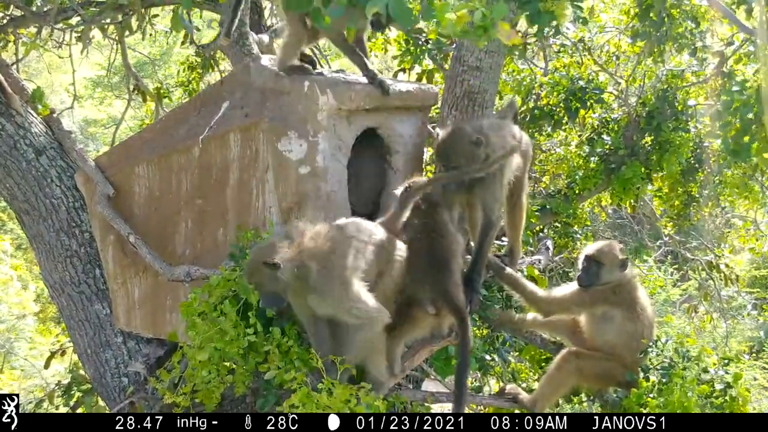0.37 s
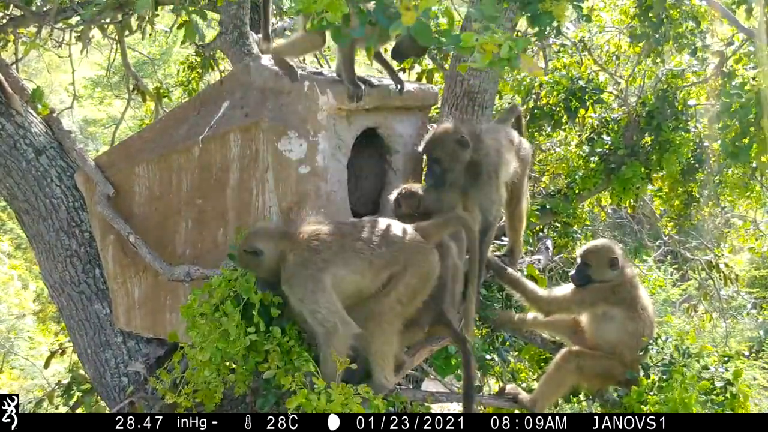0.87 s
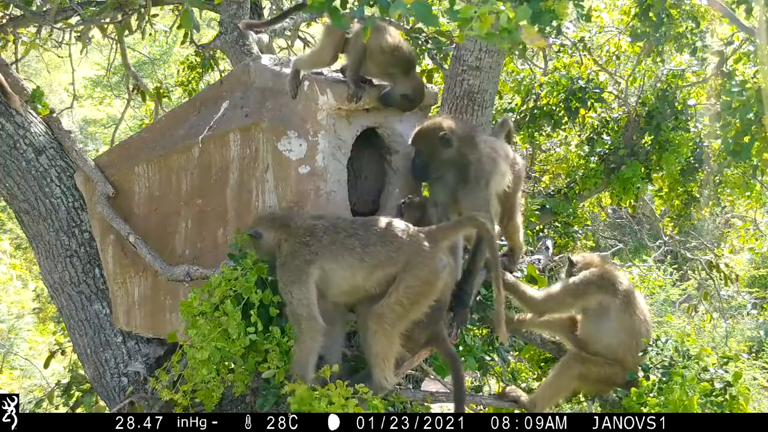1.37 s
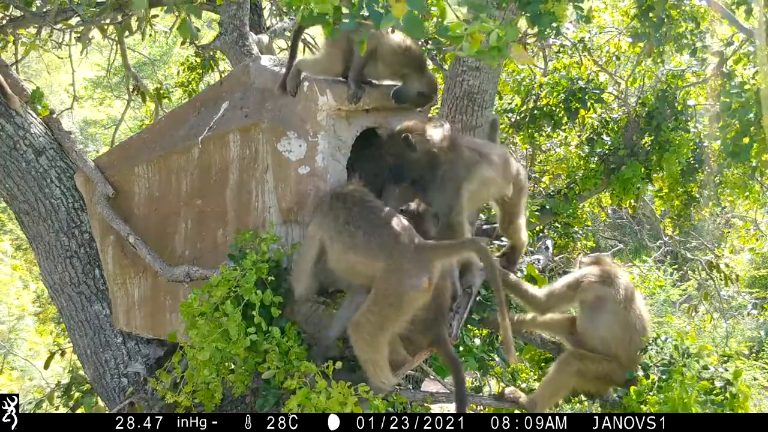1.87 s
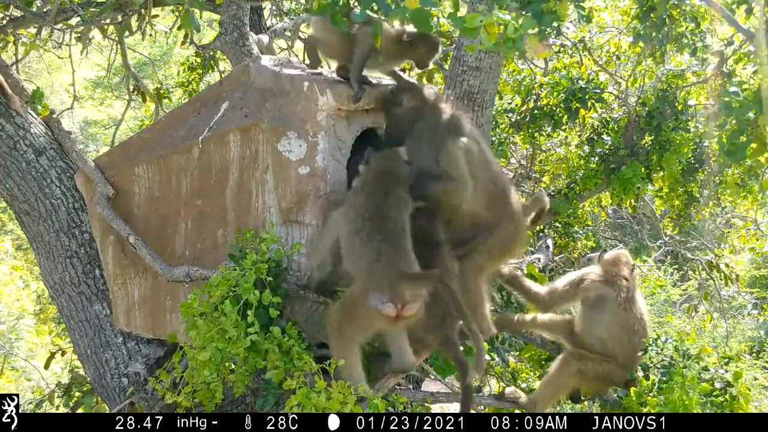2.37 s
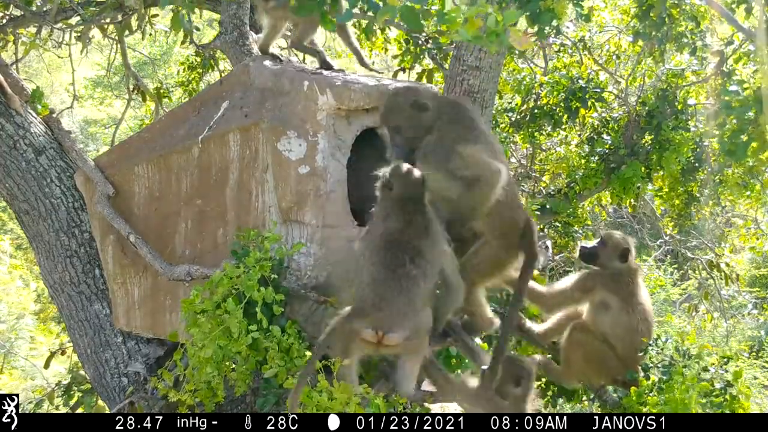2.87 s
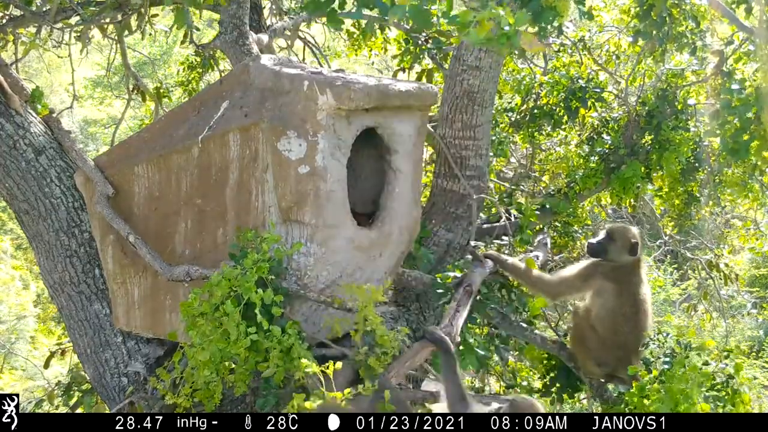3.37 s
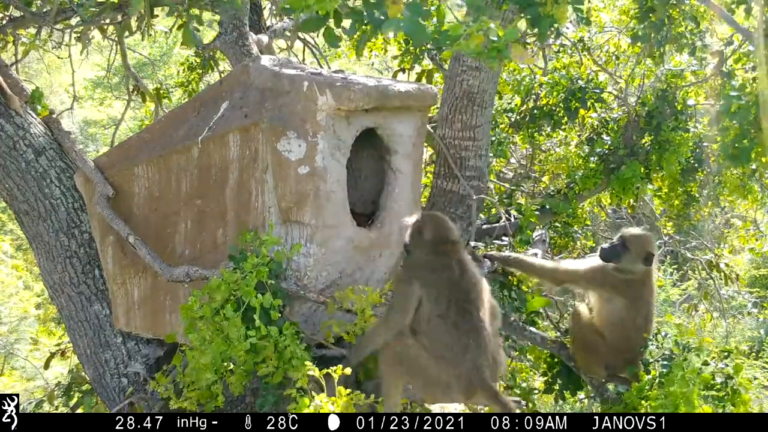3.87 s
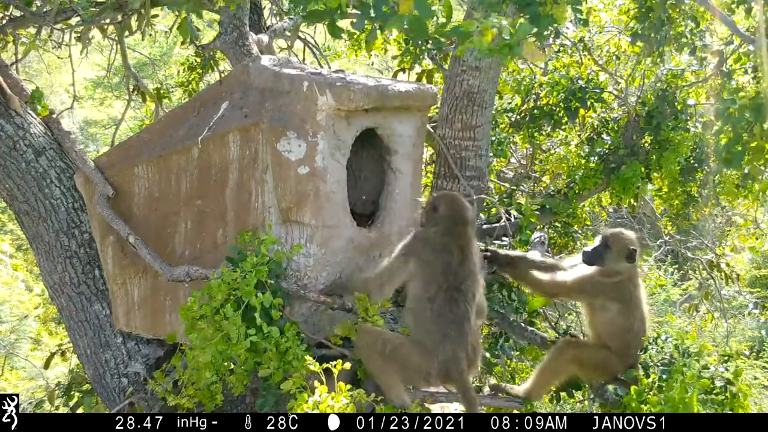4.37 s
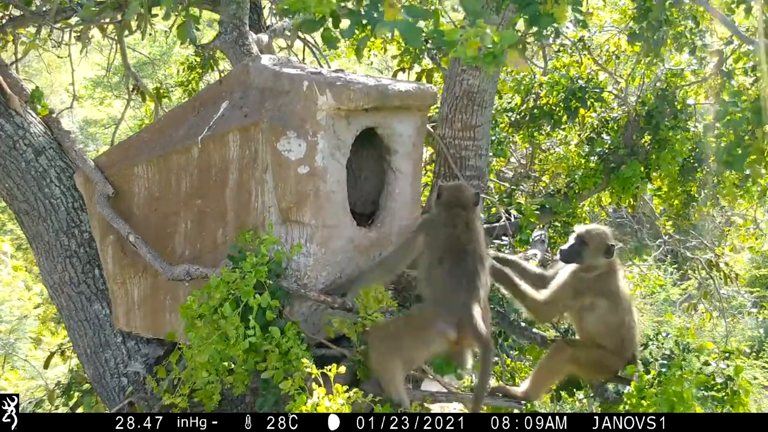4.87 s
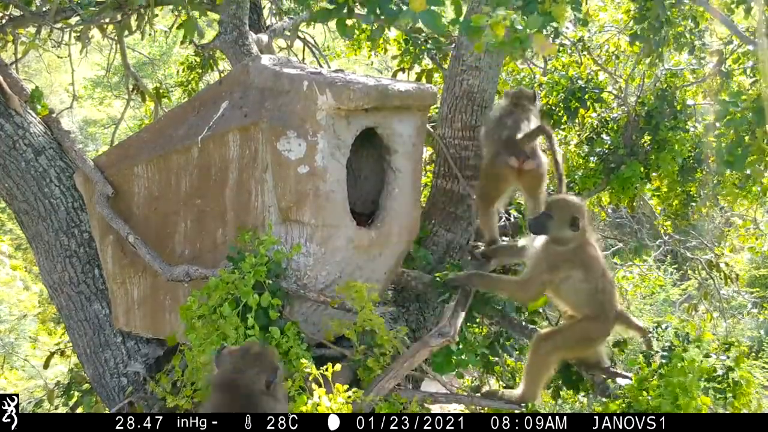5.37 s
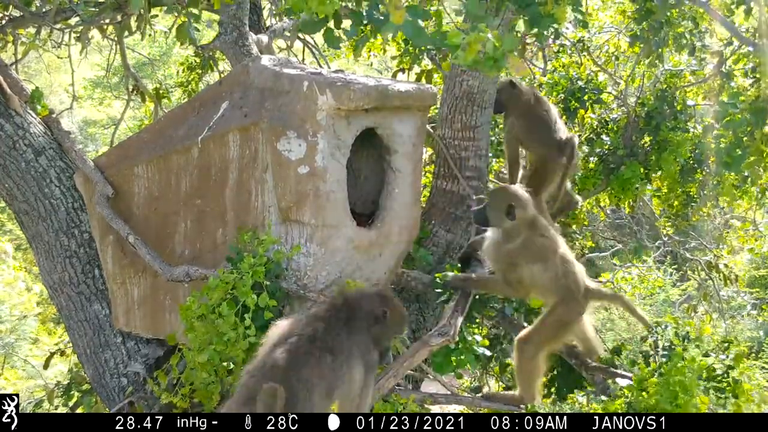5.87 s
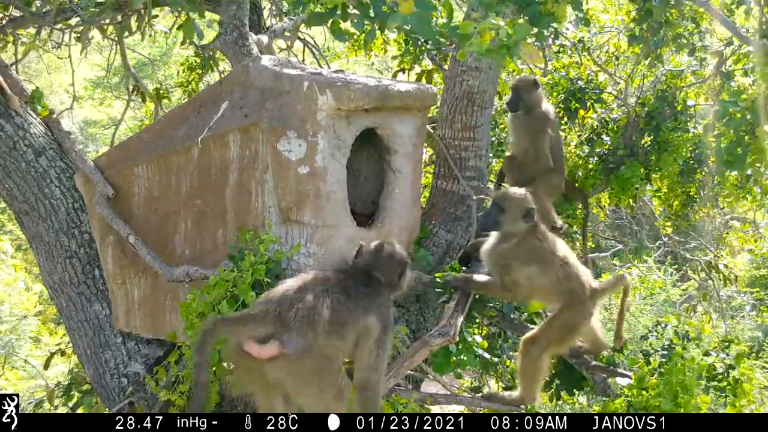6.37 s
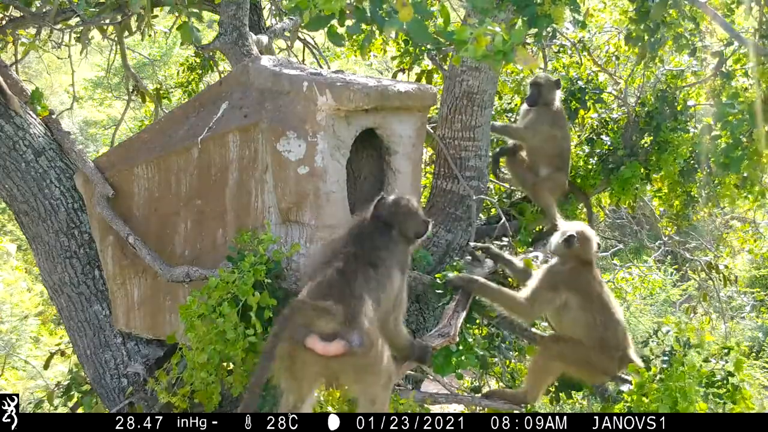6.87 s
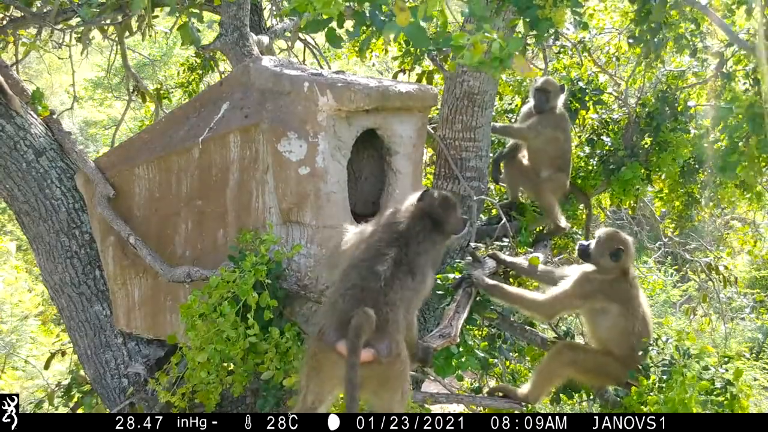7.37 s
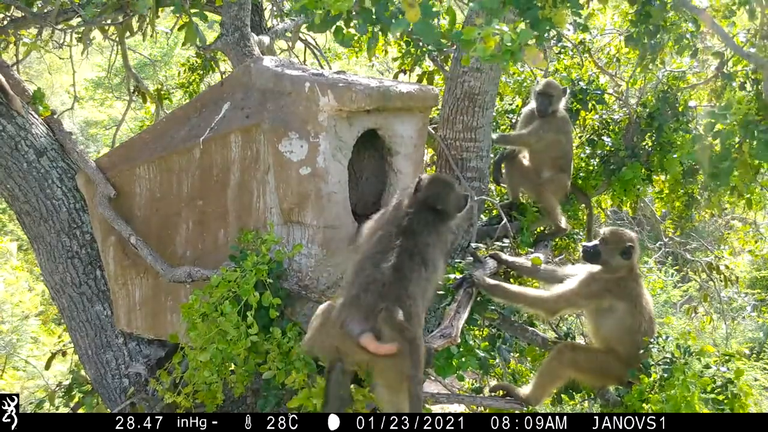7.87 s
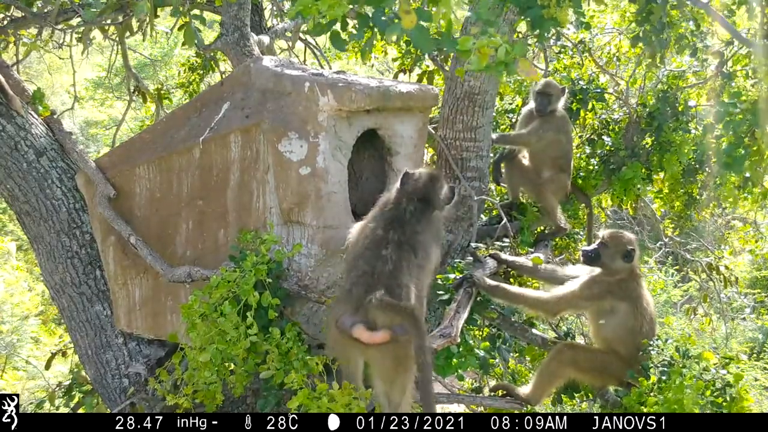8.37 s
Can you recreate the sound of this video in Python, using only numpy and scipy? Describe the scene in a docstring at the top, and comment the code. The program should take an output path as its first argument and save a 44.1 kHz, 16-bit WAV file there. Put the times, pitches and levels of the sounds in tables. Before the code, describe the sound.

Close to a small, treble-dulled outdoor microphone, baboons clamber around a tree-mounted box. At first only light rustle and distant bird whistles are heard over a soft steady hush. Woody bumps and twig ticks gather, swelling into a loud leafy crash with hard snaps midway. Smaller crackles and rustles follow, then sparse chirps, and finally fluttering low wind bursts.

```python
"""A bird trills and a twig snaps over the hush of the bush (soft patchy noise); chirps and squeaks follow
(gliding whistles). Baboons then thump a wooden nest box (noisy blows ringing its planks) and drop through
leafy branches: leaves swell (showers of noise grains) and twigs crack (a click and splinters through a ring).
The rustle thins out, birds call on, and near the end wind pops on the microphone (one-cycle bursts on a rumble).
A small trail camera hears it close up, dull in the treble, its circuits whining faintly (a cluster of sines)."""
import sys
import numpy as np
from scipy import signal
from scipy.io import wavfile
from scipy.ndimage import uniform_filter1d

SR = 44100
rng = np.random.default_rng(int(sys.argv[2]) if len(sys.argv) > 2 else 0)


def pcm_store(signal):
    """Save signal as 16-bit PCM."""
    levels = np.round(np.clip(np.atleast_2d(signal), -1, 1) * 32767)
    wavfile.write(sys.argv[1], SR, levels.astype(np.int16).T)


def boost_factor(decibels):
    """Convert a level in decibels to a linear amplitude factor."""
    exponent = np.asarray(decibels, float) / 20
    return 10 ** exponent


N = 373968  # length in samples

# tone of the hush: [f/Hz, level/dB]
HUSH_TONE = [(60, -39.5), (120, -7), (300, -1.5), (620, 2), (1400, 0.5), (2600, -5), (4000, -11),
             (8000, -20.5), (16000, -9.5)]
HUSH_DB = -55  # rms

# wind rumble over the microphone port: [t/s, level/dB]
WIND_LEVEL = [(0, -68), (.6, -65), (.85, -75), (2, -72.5), (2.9, -74), (3.4, -67), (4, -71.5), (6, -79),
              (7.4, -72.5), (7.9, -64.5), (8.48, -55.5)]
# tone of that rumble: [f/Hz, level/dB]
RUMBLE_TONE = [(8, -6.5), (25, -5), (70, -3), (150, -10.5), (400, -15.0), (1500, -72.5)]
# the strongest eddies bursting on the port: [centre t/s, level/dB, f/Hz]
POPS = [(7.58, -45, 100), (7.926, -44, 106), (7.961, -44, 105), (8.04, -36.5, 205), (8.055, -40, 130),
        (8.11, -32.5, 138), (8.18, -41, 137), (8.212, -41, 127), (8.311, -35, 218), (8.328, -40, 256),
        (8.352, -40, 161), (8.375, -36, 170), (8.391, -38.5, 193)]
# span of the random lesser eddies: [from t/s, to t/s, middle level/dB, lowest f/Hz, highest f/Hz]
GUST = (8.0, 8.46, -48.5, 110, 227)

# a small bird's calls of three chirps: [middle chirp t/s, level/dB of the last two, level/dB of the first]
BIRD_CALLS = [(1.065, -55, -60), (1.737, -54, -58), (5.31, -58, -70), (6.055, -54, -65),
              (6.867, -52.5, -70), (7.614, -56, -59), (8.333, -55.5, -61)]
# the chirps within a call: [t/s from the middle chirp, f/Hz]
CALL_PATTERN = [(-.054, 3000), (0, 3080), (.055, 3080)]
CHIRP_GLIDE_HZ, CHIRP_S = -430, .036
# other whistles and squeaks: [centre t/s, level/dB, centre f/Hz, glide f/Hz, length t/s]
WHISTLES = [(0.848, -56, 1920, -200, 0.063), (1.221, -58, 3225, 300, 0.03),
            (1.275, -61.5, 3470, 150, 0.065), (1.338, -56, 3190, -430, 0.038),
            (1.66, -56, 2270, -300, 0.034), (2.697, -50.5, 2750, 600, 0.082),
            (5.495, -52.5, 2760, -200, 0.06), (5.545, -52, 3230, -300, .025),
            (6.925, -53.5, 2005, -100, 0.052), (8.426, -56, 1646, -500, 0.042), (8.43, -56, 5950, 450, .06)]
# phrases of a trilling bird, levels 6 dB under the nominal sine peak:
# [start t/s, length t/s, first level/dB, last level/dB, first f/Hz, last f/Hz]
TRILLS = [(0, .1, -61, -67, 1500, 1520), (.525, .65, -60, -62.5, 1316, 1550),
          (2.103, .21, -65, -58, 1350, 1400), (7.03, 0.153, -58, -64, 1403, 1300),
          (7.65, .34, -62, -64, 1485, 1395)]
TRILL_PER_S = 41  # notes a second on average
# scratchy squeaks: [from t/s, to t/s, level/dB, lowest f/Hz, highest f/Hz]
CHATTER = (1.65, 1.85, -57, 1750, 2550)

# hands and feet on box and boughs: [fullest force t/s, peak level/dB, strongest f/Hz, contact t/s]
THUMPS = [(2.411, -43, 394, 0.0017), (2.45, -30, 550, 0.0028), (2.531, -44, 298, 0.0029),
          (2.865, -32, 630, 0.012), (2.93, -46, 338, 0.0072), (3.004, -39, 380, 0.0019),
          (3.105, -44, 345, 0.01), (3.183, -34.5, 500, 0.011), (3.265, -46.5, 240, 0.0056),
          (3.447, -44, 750, 0.006), (4.244, -39.5, 480, 0.005)]
# ringing planks of the box: [f/Hz, level/dB, 60 dB decay t/s]
PLANKS = [(255, -6.5, 0.06), (389, 3, 0.024), (500, 2.5, 0.059), (619, 12.5, 0.02), (772, 1.5, 0.064),
          (890, 12.5, 0.023)]

# clearest cracks of twigs and claws: [t/s, peak level/dB, ring f/Hz, time for the splinters to halve t/ms]
SNAPS = [(0.0842, -38.5, 3020, 3.3), (1.1142, -40.5, 3300, 2.7), (1.8502, -32.5, 2370, 1.9),
         (2.323, -26, 1800, 2.16), (2.4862, -35, 4170, 3.3), (2.5273, -31, 2200, 2),
         (2.588, -34, 2260, 5.3), (2.6043, -31.5, 2150, 3.1), (2.6984, -30.5, 2800, 2),
         (2.7365, -29.5, 1800, 2.9), (2.8002, -23.5, 2020, 3.2), (2.9292, -28, 2050, 1.2),
         (3.0956, -32.5, 3200, 4.6), (3.151, -30, 3280, 1.9), (3.1807, -27, 2200, 2.6),
         (3.3313, -22.5, 3770, 2.2), (3.4145, -12, 1890, 1.8), (3.512, -21, 2630, 1.1),
         (3.5481, -13.5, 2580, 1.1), (3.5659, -16.5, 2890, 1.7), (3.606, -25, 3640, 2.7),
         (3.662, -21.5, 4160, 1.3), (3.9316, -31, 2700, 2.2), (4.106, -25, 2390, 0.61),
         (4.3132, -26.5, 3540, 1.1), (4.5889, -30.5, 4070, 1.6), (4.6643, -27.5, 2850, 2.6),
         (4.733, -33.5, 3620, 2.4), (4.8239, -31.5, 3510, 1.9), (4.9574, -23.5, 3550, 1.65),
         (5.0306, -26, 1710, 2), (5.072, -34.5, 1610, 2.1), (5.4365, -29.5, 2710, 1.7),
         (5.4823, -33, 2780, 1.5), (5.5791, -28, 2150, 1.8), (5.7741, -39.5, 2820, 4.6),
         (6.6225, -37, 1540, 1.5), (6.73, -42, 3770, 3.5), (7.234, -40, 2340, 2.7), (7.319, -40, 2750, 3),
         (7.5172, -39.5, 2090, 2.1)]
# tone of the bare crack: [f/Hz, level/dB]
TWIG_TONE = [(300, -12), (1000, 2.5), (2000, 5.5), (4500, 7), (9000, 1.5), (16000, -18.5)]
# lesser cracks: middle of their peaks above the rustle, full spread of those peaks
LESSER_OVER_DB, LESSER_SPREAD_DB = 8, 3
LESSER_HZ, LESSER_MS = (1970, 4200), (0.96, 3.9)

# how hard the leaves are shaken: [t/s, level/dB]
SHAKE = [(0, -56), (0.17, -50), (0.27, -53.5), (0.45, -58.5), (1.0, -59.5), (1.55, -63), (1.68, -57.5),
         (1.85, -62), (2.17, -59), (2.32, -50), (2.65, -51.5), (2.88, -45), (3.05, -46.5), (3.1, -40),
         (3.2, -40), (3.38, -31), (3.54, -27.5), (3.68, -36.5), (3.92, -43), (4.25, -45.5), (4.34, -38.5),
         (4.48, -42.5), (4.55, -47), (4.7, -45), (4.95, -48.5), (5.39, -53.5), (5.46, -46.5), (5.6, -46),
         (6.4, -57.5), (6.65, -50.5), (6.85, -53.5), (7.03, -51.5), (7.5, -60), (7.95, -59), (8.1, -56.5),
         (8.48, -64.5)]
# tone of dry leaves, which hiss: [f/Hz, level/dB]
DRY_TONE = [(100, -32), (400, -16), (1000, -21.5), (1540, -5.5), (2400, -5), (3700, -1), (8000, -3),
            (16000, -6.5)]
# tone of bark and stems, which scrape lower: [f/Hz, level/dB]
STEM_TONE = [(100, -25), (400, -14), (1000, -8.5), (1600, -4.5), (2400, -5.5), (3400, -6.5), (8000, -12),
             (16000, -18)]
# share of dry leaves: it grows with the shaking and wanders
DRY_AT_50_DB, DRY_PER_DB, DRY_WANDER = .58, .008, .12  # share at -50 dB, slope, rms

# the housing dulls the treble and cancels near 6.7 kHz: [f/Hz, level/dB]
HOUSING = [(4100, 1.5), (4800, -10.5), (5500, -18), (6200, -26.5), (6700, -41.5), (7100, -29.5),
           (7600, -15.5), (8600, -19.5), (9800, -23.5), (10300, -31), (12200, -31.5), (13200, -67),
           (13700, -51), (16000, -51)]
# circuit whine, a buzz of close tones: [f/Hz, rms level/dB]
WHINE = [(7590, -101), (7650, -99), (7709, -92), (7768, -83), (7796, -90), (7827, -83), (7887, -92),
         (7946, -97), (8005, -99)]
# circuit hiss, as gain on white noise of rms 1: [f/Hz, level/dB]
HISS_TONE = [(5000, -78.5), (11800, -86), (13200, -99), (13600, -88), (15400, -81.5)]


def evened(x):
    """Scales to rms 1."""
    return x / np.sqrt(np.mean(x ** 2) + 1e-20)


def curve(rows):
    """Draws a (time, level) table as a line with a value at every sample."""
    t, level = np.transpose(rows)
    return np.interp(np.arange(N) / SR, t, level)


def coloured(x, points, size=4096):
    """Minimum-phase equaliser through the given (Hz, dB) points, so nothing rings ahead of its cause."""
    hz, db = np.transpose(points)
    at = abs(np.fft.fftfreq(size, 1 / SR))
    log_gain = np.log(boost_factor(np.interp(np.log(at + 1), np.log(hz + 1), db)))
    taps = np.fft.ifft(np.exp(np.conj(signal.hilbert(log_gain)))).real
    return signal.oaconvolve(x, taps[:size // 2])[:len(x)]


def add(mix, s, sound):
    """Lays a sound into the mix from time s."""
    part = mix[max(round(s * SR), 0):][:len(sound)]
    part += sound[:len(part)]


def ring(x, hz, width_hz):
    """A two-pole resonance."""
    return signal.lfilter(*signal.iirpeak(hz, hz / width_hz, SR), x)


def lumps(size):
    """Slow random drift of rms 1, in lumps about size samples long."""
    once = uniform_filter1d(rng.standard_normal(N), size)
    return evened(uniform_filter1d(once, size))


def patchy_noise(patchy_db, size=512):
    """White noise whose level drifts in patches of time and pitch."""
    real, imag, patches = rng.standard_normal((N * 4 // size + 5, size // 2 + 1, 3)).T
    patches = uniform_filter1d(uniform_filter1d(patches, 8, 0), 16, 1)
    spectrum = (real + 1j * imag) * boost_factor(patchy_db * evened(patches))
    noise = signal.istft(spectrum, nperseg=size, noverlap=size * 3 // 4)[1]
    return evened(noise[:N])


def hush():
    """The bush's steady bed: faintly patchy noise, strongest in the low mids."""
    return boost_factor(HUSH_DB) * evened(coloured(patchy_noise(0.47, size=1024), HUSH_TONE))


def lesser_eddies(count):
    """Rows like those of POPS, one at random in each slot of the gust."""
    start, end, gust_db, low_hz, high_hz = GUST
    late, size, pitch = rng.random((count, 3)).T
    s = start + (np.arange(count) + late) / count * (end - start)
    return list(zip(s, gust_db + 8 * (size - .5), low_hz + pitch * (high_hz - low_hz)))


def wind(count=11):
    """A lumpy rumble, and pops of about one cycle where eddies burst."""
    rumble = coloured(rng.standard_normal(N), RUMBLE_TONE, size=16384)
    out = boost_factor(curve(WIND_LEVEL)) * evened(rumble * boost_factor(2.1 * lumps(size=1500)))
    t = np.arange(-1000, 1000) / SR
    for s, db, hz in POPS + lesser_eddies(count):
        turn = 2 * np.pi * (hz * t + rng.random())
        pop = np.cos(turn) + 0.21 * np.cos(2 * turn)  # a steep edge adds an overtone
        burst = np.exp(-abs(t * hz / 0.57) ** 1.23)
        add(out, s + t[0], boost_factor(db) * burst * pop)
    return out


def whistle(hz, glide_hz, length):
    """A note that glides evenly, its strength fluttering in the air between."""
    t = np.arange(-length / 2, length / 2, 1 / SR)
    drift = evened(uniform_filter1d(rng.standard_normal(4000), size=200))
    flutter = boost_factor(2.0 * drift)[:len(t)]
    tone = np.sin(2 * np.pi * (hz * t + glide_hz / length * t ** 2 / 2))
    return flutter * signal.windows.tukey(len(t), .7) * tone


def trills():
    """A fast run of short falling notes, uneven in pace, pitch and strength."""
    out = np.zeros(N)
    beat = np.cumsum(TRILL_PER_S * (1 + 0.218 * lumps(size=800))) / SR % 1  # 0 to 1 within each note
    loudness = np.sin(np.pi * beat) ** 1.1 * boost_factor(3 * lumps(size=700))
    warble_hz = 200 * (.5 - beat) + 35 * lumps(size=500)
    for s, length, first_db, last_db, first_hz, last_hz in TRILLS:
        start, size = max(round(s * SR), 0), round(length * SR)
        span = slice(start, start + size)
        hz = np.linspace(first_hz, last_hz, size) + warble_hz[span]
        level = 2 * boost_factor(np.linspace(first_db, last_db, size)) * loudness[span]
        phrase = level * np.sin(2 * np.pi * np.cumsum(hz) / SR)
        add(out, s, phrase * signal.windows.tukey(size, .04))
    return out


def birds():
    """Gliding whistles and trills, smeared by distance: a decaying noise echo trails each note."""
    out = trills()
    chirps = [(s + late, level_db, hz, CHIRP_GLIDE_HZ, CHIRP_S)
              for s, db, opening_db in BIRD_CALLS
              for (late, hz), level_db in zip(CALL_PATTERN, (opening_db, db, db))]
    for s, db, hz, glide_hz, length in WHISTLES + chirps:
        add(out, s - length / 2, boost_factor(db) * whistle(hz, glide_hz, length))
    echo = rng.standard_normal(6000) * boost_factor(-60 * np.arange(6000) / SR / .25)
    return out + boost_factor(-5) * signal.oaconvolve(out, echo / np.linalg.norm(echo))[:N]


def chatter(count=36):
    """Quick, overlapping squeaks of scattered pitch, one soon after another."""
    start, end, db, low_hz, high_hz = CHATTER
    out = np.zeros(N)
    for k, (late, pitch, glide) in enumerate(rng.random((count, 3))):
        squeak = whistle(low_hz + pitch * (high_hz - low_hz), 300 * (glide - .7), .009)
        add(out, start + (k + late) / count * (end - start), boost_factor(db) * squeak)
    return out


def thumps():
    """A rough, soft contact rings the planks nearest its own pitch; the box is too small for deep bass."""
    t, out = np.arange(5000) / SR, np.zeros(N)
    for s, db, hz, contact in THUMPS:
        force = np.exp(-((t[:1800] - .02) / contact) ** 2)  # fullest 20 ms in
        blow = rng.standard_normal(1800) * force
        planks = np.zeros(5000)
        for plank_hz, plank_db, t60 in PLANKS:
            mismatch_db = 14.5 * abs(np.log2(plank_hz / hz))
            planks += boost_factor(plank_db - 60 * t / t60 - mismatch_db) * np.sin(2 * np.pi * plank_hz * t)
        sound = ring(ring(signal.fftconvolve(blow, planks), hz, 1.04 * hz), hz, 2.4 * hz)
        sound[:1800] += 0.2 * abs(sound).max() * ring(blow, 3 * hz, 3 * hz)  # the scuff of skin on wood
        add(out, s - .02, boost_factor(db) * sound / abs(sound).max())
    return out


def lesser_snaps(count=40):
    """Rows like those of SNAPS, at random over the whole scuffle, their peaks riding above the rustle."""
    late, size, pitch, length = rng.random((count, 4)).T
    s = (np.arange(count) + late) / count * (N / SR - .1)
    db = np.interp(s, *np.transpose(SHAKE)) + LESSER_OVER_DB + LESSER_SPREAD_DB * (size - .5)
    return list(zip(s, db, np.interp(pitch, [0, 1], LESSER_HZ), np.interp(length, [0, 1], LESSER_MS)))


def snaps():
    """A sharp crack, then splinters, through the twig's broad ring; nearby leaves scatter a short tail."""
    t, out = np.arange(3000) / SR, np.zeros(N)
    for s, db, hz, ms in SNAPS + lesser_snaps():
        fade = 0.19 * np.exp(-700 * t / ms) + 0.044 * boost_factor(-60 * t / 0.12)  # splinters, then leaves
        splinters = rng.standard_normal(3000) * fade * np.minimum(2500 * t / ms, 1)
        crack = splinters + 3.4 / ms * signal.unit_impulse(3000, 20)
        rung = ring(ring(crack, hz, 0.27 * hz), hz, 2.3 * hz)
        sound = rung + 0.17 * coloured(crack, TWIG_TONE, size=512)
        add(out, s, boost_factor(db) * sound / abs(uniform_filter1d(sound, size=3)).max())
    return out


def leaves():
    """Leaves slap and scrape: clumped short grains of many strengths over a patchy blur of noise."""
    clump = boost_factor(6.5 * lumps(size=700))
    t, grains = np.arange(400) / SR, np.zeros(N)
    for _ in range(24):  # kinds of grain, each with its own ring
        struck = rng.random(N) < 40 * clump / SR
        strength = boost_factor(4.5 * np.minimum(rng.exponential(1, N), 3.5))
        slap = rng.standard_normal(400) * boost_factor(-60 * t / .006)
        grain = evened(slap) + 0.36 * evened(ring(slap, rng.uniform(1650, 4500), 660))
        grains += signal.oaconvolve(struck * strength, grain)[:N]
    blur = patchy_noise(1.5) * boost_factor(1.5 * lumps(size=600))
    rustle = .75 * evened(grains) + blur
    shake_db = curve(SHAKE)
    dry_share = np.clip(DRY_AT_50_DB + DRY_PER_DB * (shake_db + 50) + DRY_WANDER * lumps(size=3000), 0, 1)
    hissing = dry_share * evened(coloured(rustle, DRY_TONE))
    scraping = (1 - dry_share) * evened(coloured(rustle, STEM_TONE))
    return boost_factor(shake_db) * (hissing + scraping)


def scene():
    """All that reaches the camera, as one channel."""
    return (hush() + wind() + birds() + chatter() + thumps() + snaps() + leaves())[None]


def low_pass(x):
    """Removes everything above the highest recorded frequency."""
    return signal.sosfilt(signal.butter(12, 15719, fs=SR, output="sos"), x)


def record(dry):
    """The camera's own sound: the housing colours the scene, the circuits add hiss and whine."""
    t = np.arange(N) / SR
    drift = np.cumsum(.5 * lumps(size=4000)) / SR  # the tones waver together a little
    whine = np.zeros(N)
    for hz, db in WHINE:
        whine += np.sqrt(2) * boost_factor(db) * np.sin(2 * np.pi * (hz * t + drift + rng.random()))
    # a faint band of noise just below the whine, like many weaker tones run together
    low_band = boost_factor(-94) * evened(ring(rng.standard_normal(N), 7350, 500))
    hiss = coloured(rng.standard_normal(N), HISS_TONE)
    mix = coloured(dry[0], HOUSING) + whine + low_band + hiss
    return low_pass(mix[None])


dry = scene()
out = record(dry)
pcm_store(out)
```